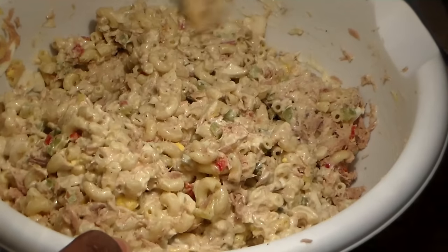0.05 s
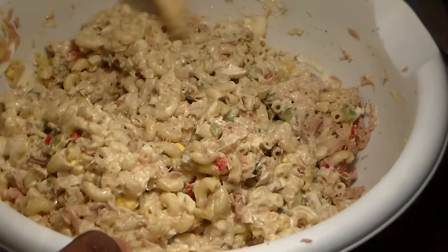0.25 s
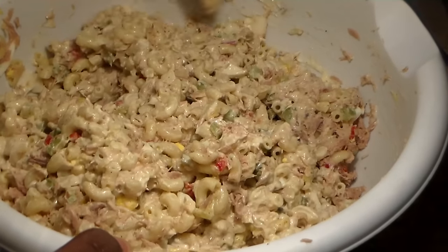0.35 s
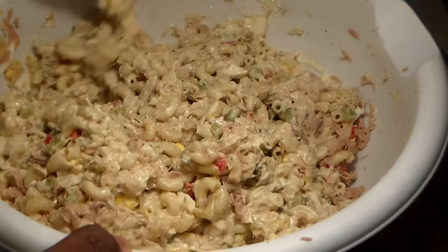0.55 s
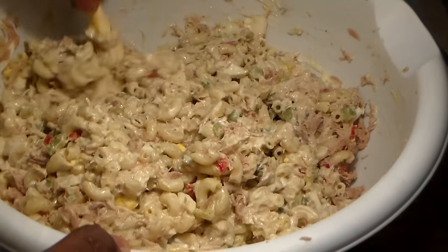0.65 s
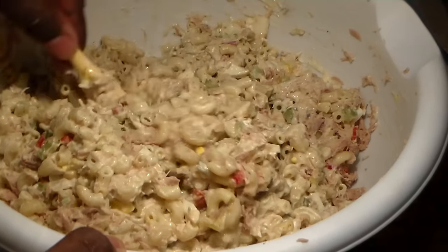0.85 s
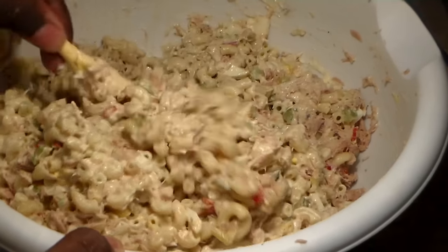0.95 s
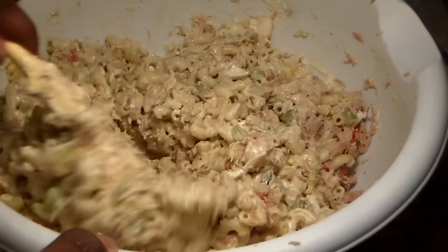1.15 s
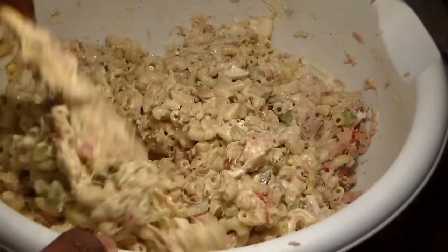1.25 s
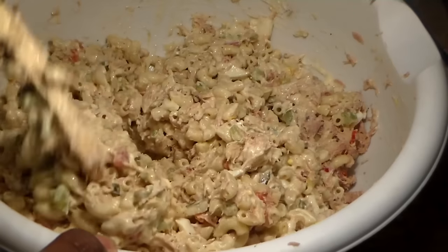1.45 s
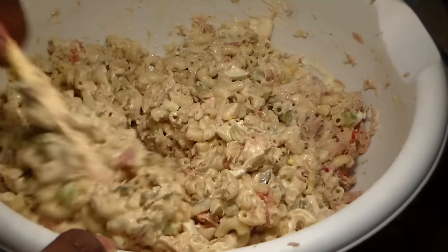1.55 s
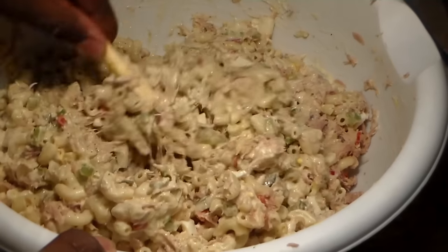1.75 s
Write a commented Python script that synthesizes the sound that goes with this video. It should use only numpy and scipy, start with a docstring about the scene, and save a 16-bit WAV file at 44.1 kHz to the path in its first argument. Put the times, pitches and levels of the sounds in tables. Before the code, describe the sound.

Wet pasta salad squelches softly under a wooden spoon, close by in a quiet kitchen. At 0.2 seconds the spoon knocks sharply on the plastic bowl, then scrapes its side until about 0.45. A lighter knock at 0.65 starts a longer, sticky fold with faint thuds, lasting until about 1.3. Tiny pops and ticks follow as the pasta settles, and another stir begins near 1.75.

```python
"""A quiet kitchen, close by: a wooden spoon folds wet pasta salad in a plastic bowl.
It knocks the bowl, scrapes along the wall, digs in again and turns the salad over.
Films of dressing tear in countless tiny bursts, air pockets pop, lumps drop back and
sticky pasta ticks apart. Under it lie room rumble, hiss and a faint appliance hum."""
import sys
import numpy as np
from scipy import signal
from scipy.fft import rfft, irfft, next_fast_len
from scipy.io import wavfile
from scipy.ndimage import uniform_filter1d, map_coordinates

SR = 44100
rng = np.random.default_rng(int(sys.argv[2]) if len(sys.argv) > 2 else 0)


def unload_wav(signal):
    """Save mono or channel-first audio to the path in sys.argv[1] as 16-bit WAV at rate SR, clipped to [-1, 1]."""
    wavfile.write(
        sys.argv[1],
        SR,
        np.round(np.clip(np.atleast_2d(signal).T, -1, 1) * 32767).astype(np.int16),
    )


N = 79380


def amp(db):
    return 10 ** (np.asarray(db) / 20)


def unit_rms(x):
    return x / np.sqrt(np.mean(x ** 2) + 1e-20)


def at_hz(points, hz):
    """Interpolate (Hz, value) points on a log frequency axis."""
    point_hz, values = np.transpose(points)
    return np.interp(np.log(hz + 1), np.log(point_hz + 1), values)


def curves(rows):
    """One value per sample for each column after the time."""
    times_s, *columns = np.transpose(rows)
    return [np.interp(np.arange(N) / SR, times_s, column) for column in columns]


def wobble(knots_per_s):
    """A smooth random curve."""
    return map_coordinates(rng.standard_normal(N // 10), [np.arange(N) * knots_per_s / SR], mode="wrap")


def filtered(x, gain_at_hz):
    """Zero-phase FFT filter."""
    size = next_fast_len(N + SR // 2)
    return irfft(rfft(x, size) * gain_at_hz(np.fft.rfftfreq(size, 1 / SR)), size)[..., :N]


def spread(pair, likeness):
    """Mix two unrelated signals to left and right of the given likeness."""
    angle = lambda hz: np.arccos(np.clip(at_hz(likeness, hz), -1, 1)) / 2
    mid, side = filtered(pair, lambda hz: np.array([np.cos(angle(hz)), np.sin(angle(hz))]))
    return np.array([mid + side, mid - side])


def since(start_s):
    return np.maximum(np.arange(N) / SR - start_s, 0)


def decay(t, t60_s):
    return np.exp(-np.log(1000) * t / t60_s)


def ring(start_s, hz, t60_s, rise_s=1e-4):
    """A damped sine."""
    t = since(start_s)
    return np.sin(2 * np.pi * hz * t) * decay(t, t60_s) * (1 - np.exp(-t / rise_s))


def bursts(per_s, spread_db=3.4):
    """Random impulses, mostly small, a few large; equal power at any rate."""
    size_db = spread_db * np.minimum(rng.exponential(size=(2, N)), 3)
    fires = rng.random((2, N)) < per_s / SR
    return fires * amp(size_db) * rng.choice([-1, 1], (2, N)) / np.sqrt(per_s)


# Room decay. Each row: frequency in Hz, T60 in seconds.
ROOM_DECAY = [(150, 0.19), (1000, 0.23), (4000, 0.28), (12000, 0.16)]
# Room width. Each row: frequency in Hz, left-right likeness (1 is mono).
ROOM_LIKENESS = [(200, 0.95), (1400, 0.91), (2800, 0.76), (5600, 0.44), (10000, 0.064)]


def kitchen(x):
    """The room's diffuse stereo tail, starting after 3 ms."""
    hz, t, noise = signal.stft(rng.standard_normal((2, SR // 3)), SR, nperseg=256)
    tail = signal.istft(noise * decay(t, at_hz(ROOM_DECAY, hz)[:, None]), SR, nperseg=256)[1]
    tail *= np.arange(tail.shape[1]) / SR > .003
    return reflect(x, tail)


def reflect(x, response):
    """Mono through a normalised pair of impulse responses, at the room's width."""
    pair = signal.fftconvolve(x[None], response / np.linalg.norm(response[0]), axes=1)
    return spread(pair[:, :N], ROOM_LIKENESS)


# Steady room noise. Each row: frequency in Hz, relative density in dB.
NOISE_SPECTRUM = [(12, -6), (28, -2), (42, -3.5), (60, -6.5), (90, -16), (170, -18), (350, -20), (700, -28),
                  (1600, -38.5), (4000, -35), (14000, -39)]
# Its width. Each row: frequency in Hz, left-right likeness.
NOISE_LIKENESS = [(30, 0.85), (200, 0.79), (700, 0.48), (2000, 0.05), (8000, .03)]


def background(noise_db=-51.5, hum_hz=174.2, hum_db=-66.5):
    """Room rumble, hiss and a faint appliance hum."""
    noise = filtered(rng.standard_normal((2, N)), lambda hz: amp(at_hz(NOISE_SPECTRUM, hz)))
    hum = np.sqrt(2) * np.sin(2 * np.pi * hum_hz * since(0) + .5 * wobble(6.8))
    return amp(noise_db) * unit_rms(spread(noise, NOISE_LIKENESS)) + amp(hum_db) * hum


def squelching(spectrum, level_db, peak_per_s, patchy_db, room_db, flutter_db=1.63):
    """Films of dressing tear in clumps, their colour shifting as cavities open and close."""
    per_s = peak_per_s * amp(.8 * (level_db - level_db.max()))  # slow stirring, fewer bursts
    spectrogram = signal.stft(bursts(per_s), nperseg=256)[2]
    patches = uniform_filter1d(rng.standard_normal(spectrogram.shape[1:]), 4, axis=0)
    patches = unit_rms(uniform_filter1d(patches, 5, axis=1))
    tears = signal.istft(spectrogram * amp(patchy_db * patches), nperseg=256)[1][:, :N]
    tears = filtered(tears, lambda hz: amp(at_hz(spectrum, hz)))
    flutter = amp(flutter_db * wobble(knots_per_s=70))
    tears = unit_rms(tears * flutter) * amp(level_db)
    room = amp(room_db) * kitchen(tears[0])
    return (spread(tears, ROOM_LIKENESS) + room) / np.hypot(1, amp(room_db))


# Spoon strokes. Each row: time in seconds, then mush, squelch and crackle envelopes in dB.
STROKES = [(0, -71.5, -59.5, -69), (.2, -64.5, -81, -74), (.24, -45.5, -46, -63),
           (.285, -50.5, -60.5, -61.5), (.32, -58, -50, -53.5), (.38, -54.5, -48, -53.5),
           (.435, -63, -59.5, -60), (.46, -69, -49, -54.5), (.49, -75, -63, -69), (.52, -75, -63.5, -52.5),
           (.56, -80, -73.5, -78), (.642, -96, -80, -74), (.655, -49.5, -48, -57), (.73, -55.5, -49.5, -59),
           (.78, -47.5, -53.5, -65), (.84, -52, -47.5, -54.5), (.872, -51.5, -46, -51.5),
           (.92, -49, -46, -54), (.972, -51, -43.5, -48), (1.015, -49.5, -50, -56),
           (1.065, -58.5, -61, -61.5), (1.13, -45, -47.5, -59.5), (1.2, -51, -46, -52),
           (1.25, -58, -55, -51), (1.29, -59.5, -60.5, -60.5), (1.39, -66, -60.5, -61),
           (1.47, -79.5, -57.5, -66), (1.52, -57.5, -57, -56), (1.6, -78, -69, -73), (1.72, -68, -62, -72),
           (1.75, -57.5, -62.5, -64.5), (1.8, -63.5, -50.5, -59.5)]
# Low, mid and high burst spectra. Each row: frequency in Hz, relative level in dB.
MUSH_SPECTRUM = [(60, -22), (150, -1), (300, -1), (500, -1.5), (830, 2.5), (1100, -5), (1600, 4.5),
                 (4000, -59)]
SQUELCH_SPECTRUM = [(500, -56), (1000, -0.5), (1270, -4.5), (1750, -6), (2100, -2.5), (2750, -0.5),
                    (3400, -2), (4100, -9), (5500, -20.5), (12000, -16)]
CRACKLE_SPECTRUM = [(2000, -59), (4000, -3), (5000, 1), (5800, -0.5), (6600, 0), (8000, -4.5), (9800, -3.5),
                    (12000, -10), (14500, -14)]


def salad():
    """Large, middling and tiny bursts follow the spoon's strokes."""
    mush_db, squelch_db, crackle_db = curves(STROKES)
    mush = squelching(MUSH_SPECTRUM, mush_db, peak_per_s=1200, patchy_db=3, room_db=1)
    squelch = squelching(SQUELCH_SPECTRUM, squelch_db, peak_per_s=3000, patchy_db=2.5, room_db=-4)
    crackle = squelching(CRACKLE_SPECTRUM, crackle_db, peak_per_s=6000, patchy_db=2.5, room_db=-6)
    return mush + squelch + amp(2.5) * crackle


# Spoon knocks. Each row: start in seconds, level in dB, clack pitch in Hz, clack T60 in seconds,
# then bowl ring, crack and room in relative dB.
SPOON_KNOCKS = [(.2061, -8, 1050, 0.0073, -25.5, -14, -8), (.6475, -23.5, 1307, 0.016, -23.5, -17, -5.5)]
# Modes of the filled bowl. Each row: frequency in Hz, relative level in dB, T60 in seconds.
BOWL_MODES = [(118.6, -9, 0.22), (162.5, -4.5, 0.16), (271, -2, 0.17), (333, -1.5, .2), (420, 1.5, 0.16),
              (614, 0, 0.14), (683, -10.5, 0.34), (828, -0.5, .17), (942, -17, 0.12), (1170, -2.5, 0.26),
              (1296, -11, 0.13), (1700, -11, 0.13)]


def knocks(thump_db=-13.5, rise_s=.00035, low_cut_hz=160):
    """The spoon hits the bowl: a crack, a short clack and thump, then the bowl's damped ring."""
    low_cut = signal.butter(2, low_cut_hz, "high", fs=SR, output="sos")  # the bowl radiates little bass
    out = np.zeros((2, N))
    for start_s, db, clack_hz, clack_t60_s, bowl_db, crack_db, room_db in SPOON_KNOCKS:
        clack = ring(start_s, clack_hz, clack_t60_s, rise_s)
        thump = amp(thump_db) * ring(start_s, hz=364, t60_s=.016, rise_s=rise_s)
        crack = amp(crack_db) * ring(start_s, hz=3050, t60_s=.0014, rise_s=.00007)
        blow = signal.sosfilt(low_cut, clack - thump - crack)
        bowl = sum(amp(mode_db) * rng.choice([-1, 1]) * ring(start_s, hz, t60_s, rise_s=.00067)
                   for hz, mode_db, t60_s in BOWL_MODES)
        out += amp(db) * (blow + amp(bowl_db) * bowl + amp(room_db) * kitchen(blow) + wall_slap(blow))
    return out


def wall_slap(x, delay_s=.0354, width_s=.0048, gain_db=-11.5):
    """A cluster of echoes from the kitchen walls."""
    window = np.exp(-((since(0) - delay_s) / width_s) ** 2)
    return amp(gain_db) * reflect(x, window * rng.standard_normal((2, N)))


# Spoon along the bowl. Each row: time in seconds, level in dB.
SCRAPE_ENVELOPE = [(.28, -72), (.33, -48.5), (.365, -45), (.42, -45.5), (.45, -60), (.5, -73)]
# Spoon modes. Each row: frequency in Hz, relative level in dB, T60 in seconds.
SPOON_MODES = [(1305, -2.5, 0.026), (1760, -5, 0.018), (2230, -8, 0.0074)]


def scrape(room_db=-9.5):
    """Irregular slips along the bowl's wall ring the spoon."""
    level_db, = curves(SCRAPE_ENVELOPE)
    spoon = sum(amp(db) * ring(0, hz, t60_s) for hz, db, t60_s in SPOON_MODES)
    slips = np.diff(bursts(per_s=3000)[0])
    rasp = unit_rms(signal.fftconvolve(slips, spoon)[:N]) * amp(level_db)
    return rasp + amp(room_db) * kitchen(rasp)


# Air pockets. Each row: start in seconds, level in dB, pitch in Hz, T60 in cycles, snap in relative dB.
AIR_POCKETS = [(.3208, -32.5, 3630, 27, -24), (0.4497, -34, 2320, 12, -15), (0.4566, -34, 2840, 10, -11),
               (0.457, -36, 6200, 13, -16), (0.4956, -38, 9200, 36, -16), (0.4991, -37, 2730, 33, -16),
               (0.5081, -26, 6040, 15, -4.5), (0.6481, -40, 5800, 8.7, -1), (0.7519, -36.5, 7100, 31, -16),
               (0.8669, -30.5, 1930, 15, -15), (1.1499, -29, 3060, 18, -25), (1.2177, -29.5, 3660, 18, -6),
               (1.2411, -31.5, 6400, 33, -18), (1.321, -36.5, 4640, 16, -8), (1.3768, -34.5, 3700, 9, -8),
               (1.391, -40, 1820, 8.4, -1), (1.4897, -38, 4340, 24, -8), (1.512, -36, 4920, 19, -11),
               (1.5167, -29, 2940, 11, -18), (1.5195, -33, 4680, 26, -8.5), (1.5552, -36.5, 3540, 23, -16),
               (1.7312, -33, 3480, 14, -13), (1.7726, -33, 4520, 24, -10.5), (1.7958, -28, 3400, 17, -22),
               (1.7962, -31, 2150, 12, -25)]


def pops(room_db=-3):
    """A film snaps and the air pocket behind it rings briefly."""
    direct = sum(amp(db) * (ring(start_s, hz, cycles / hz) + amp(snap_db) * snap(start_s))
                 for start_s, db, hz, cycles, snap_db in AIR_POCKETS)
    return direct + amp(room_db) * kitchen(direct)


def snap(start_s, t60_s=.0029, top_hz=7500):
    """A film breaks: a very short noise burst, dulled by the soft dressing."""
    t = since(start_s)
    burst = (t > 0) * decay(t, t60_s) * rng.standard_normal(N)
    return filtered(burst, lambda hz: 1 / np.sqrt(1 + (hz / top_hz) ** 4))


# Salad dropping back. Each row: start in seconds, level in dB, pitch in Hz.
LANDINGS = [(0.653, -33.5, 165.6), (0.66, -34.5, 268.5), (0.89, -36, 122), (.899, -34.5, 169),
            (1.531, -51, 328)]


def lumps(room_db=-3):
    """Wet masses land with dull thuds."""
    thuds = sum(amp(db) * ring(start_s, hz, t60_s=.088, rise_s=.0034) for start_s, db, hz in LANDINGS)
    return thuds + amp(room_db) * kitchen(thuds)


def ticks(from_s=1.1, to_s=1.6, count=14, t60_cycles=14, room_db=-3):
    """Sticky pieces of pasta part one by one as the turned salad settles."""
    pitch_draws, size_draws = rng.standard_normal((count, 2)).T
    slots = np.arange(count) + rng.uniform(-.9, 1, count)
    starts_s = from_s + (to_s - from_s) * slots / count
    pitches_hz = 4550 * 2 ** (.7 * np.clip(pitch_draws, -2, 2))
    levels_db = -45.5 + 4 * size_draws
    direct = sum(amp(db) * ring(start_s, hz, t60_cycles / hz)
                 for start_s, hz, db in zip(starts_s, pitches_hz, levels_db))
    return direct + amp(room_db) * kitchen(direct)


def scene():
    """Wet sounds slightly right, knocks centred, low sounds slightly left."""
    pan_right, pan_left = amp([[-.5], [.5]]), amp([[.5], [-.5]])
    wet = salad() + scrape() + pops() + ticks()
    return wet * pan_right + knocks() + (lumps() + background()) * pan_left


def record(dry):
    """Brick-wall low-pass."""
    top_hz = 14450
    return filtered(dry, lambda hz: hz < top_hz)


dry = scene()
out = record(dry)
unload_wav(out)
```